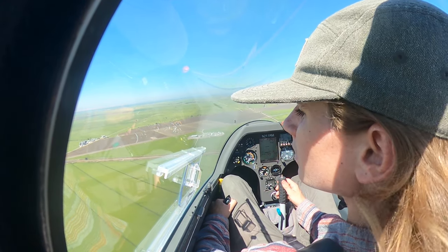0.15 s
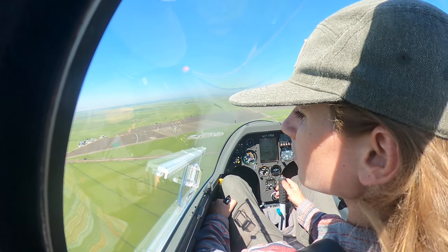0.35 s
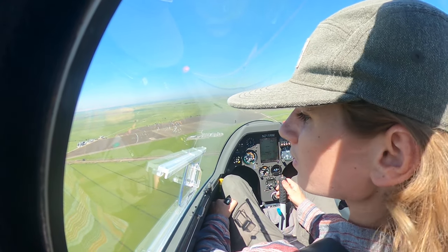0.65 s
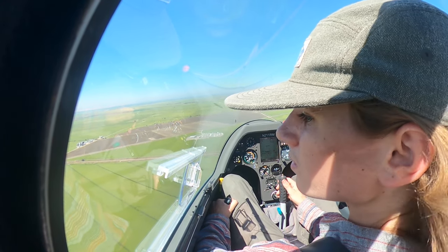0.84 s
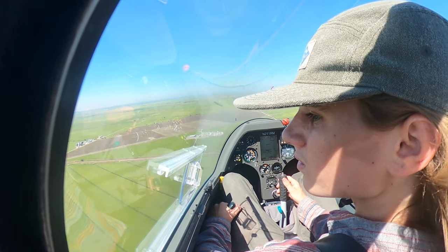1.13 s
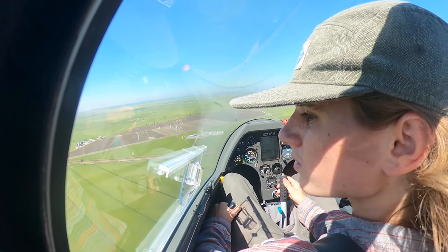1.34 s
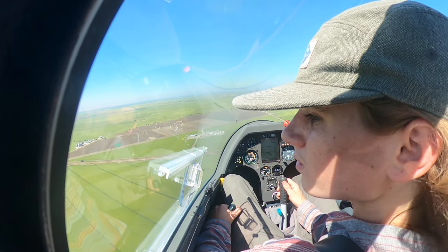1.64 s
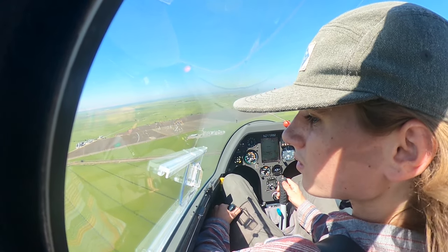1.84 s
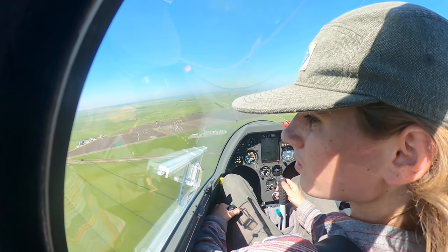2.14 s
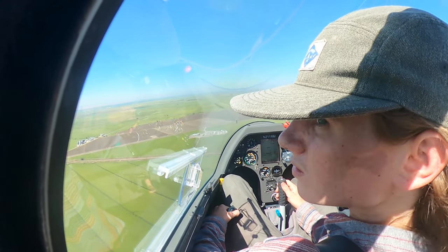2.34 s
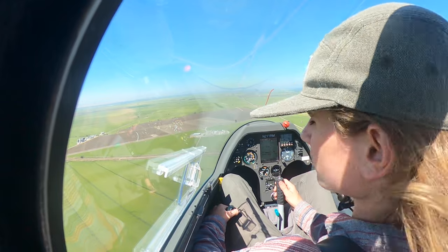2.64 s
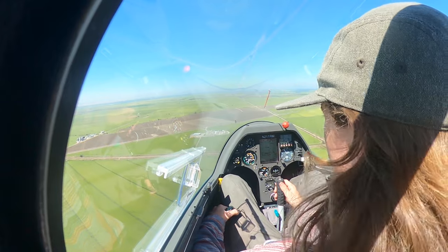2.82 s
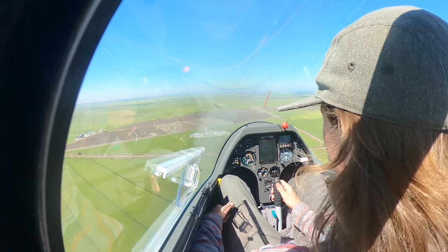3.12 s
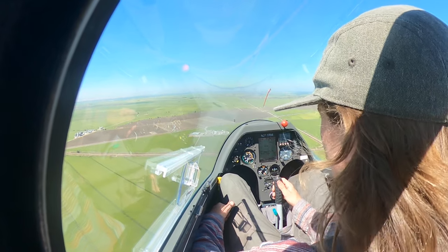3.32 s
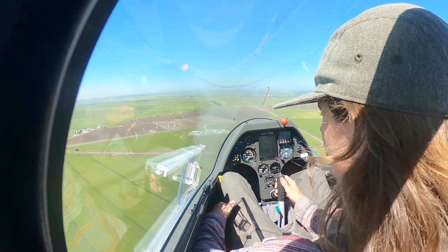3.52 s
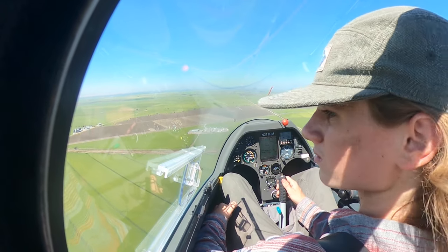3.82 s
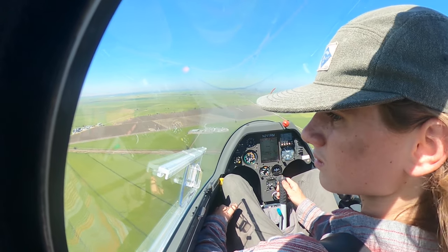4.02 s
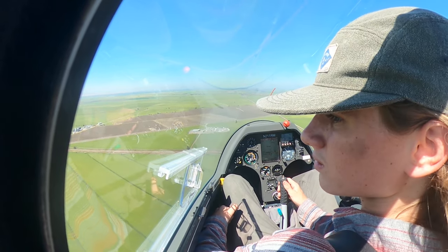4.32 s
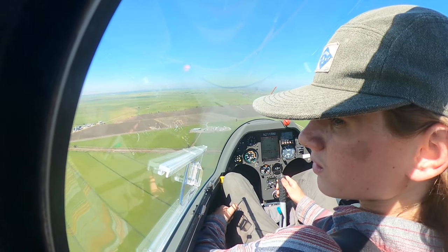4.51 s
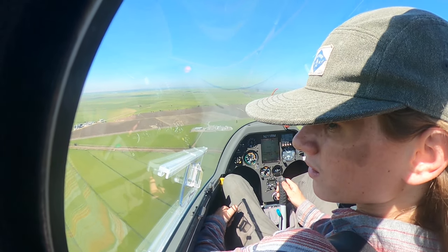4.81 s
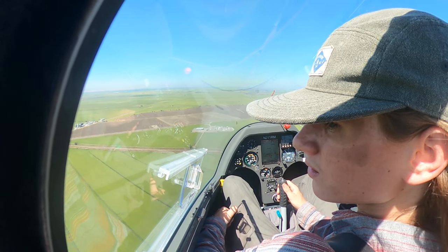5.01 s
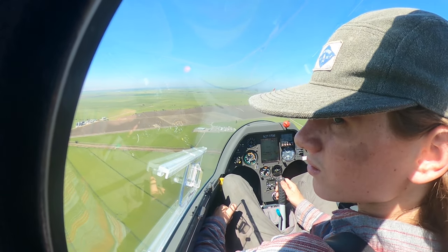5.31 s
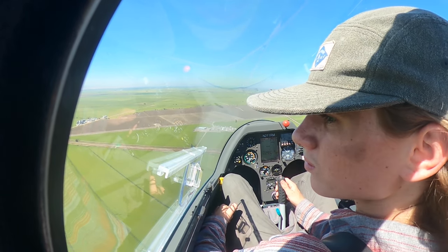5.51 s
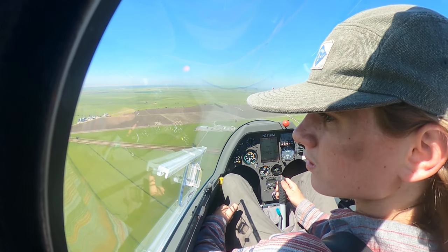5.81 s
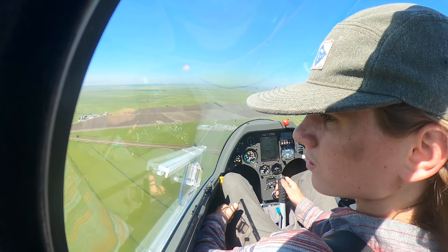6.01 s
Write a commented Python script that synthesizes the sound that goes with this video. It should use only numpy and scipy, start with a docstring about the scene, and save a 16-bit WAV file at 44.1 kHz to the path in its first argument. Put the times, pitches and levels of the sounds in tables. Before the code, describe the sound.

Steady rush of air past a glider canopy with a low wavering hum, thudding draught buffets and brief clicking knocks

```python
"""Air streams past the canopy of a glider, heard close by on a small camera with two microphone ports in
the cockpit. The turbulent boundary layer is noise with drifting patches, coloured by the modes of the cabin;
the lowest mode hums with a wavering pitch over a wide rumble of the hull. Draught from a vent buffets the
ports as short falling thuds in churning noise; gusts knock the canopy as clicks and fading bursts of noise.
Gain control eases back the loud swells."""
import sys
import numpy as np
from scipy import signal
from scipy.fft import rfft, irfft
from scipy.io import wavfile
from scipy.ndimage import uniform_filter1d

SR = 44100
rng = np.random.default_rng(int(sys.argv[2]) if len(sys.argv) > 2 else 0)


def store_pcm(level_fs):
    """Save levels as 16-bit WAV."""
    pcm = np.round(np.clip(level_fs, -1, 1) * 32767).astype(np.int16)
    wavfile.write(sys.argv[1], SR, np.atleast_2d(pcm).T)


N = 271215
T = np.arange(N) / SR  # s
HZ = np.fft.rfftfreq(N, 1 / SR)

# hiss of air through gaps, and the faint top: (frequency [Hz], relative density [dB per Hz])
HISS_COLOUR = [(500, -18), (1200, 2), (1900, -1.5), (4300, -5), (5700, -13), (6300, -12.5), (8000, -19),
               (8700, -23), (9100, -31), (10000, -40), (12500, -40), (15000, -56.5), (16000, -72)]
# gusts knock the canopy: (time [s], level of the low band [dB], level of the bright band [dB])
CANOPY_KNOCKS = [(1.066, -18, -34), (1.082, -30, -29.5), (1.104, -27.5, -36), (1.153, -19, -30),
                 (1.188, -25, -32), (1.26, -27, -26.5), (1.272, -21, -35), (1.301, -25, -46),
                 (1.335, -25, -44), (1.379, -24, -35), (1.938, -30, -33), (2.04, -31, -39),
                 (2.12, -27.5, -32), (2.329, -27, -38), (2.59, -27, -35), (2.644, -28, -38),
                 (3.155, -31.5, -46), (3.172, -28.5, -47), (4.76, -30.5, -45), (4.92, -24, -43)]


def rush():
    """Roar and hiss of the boundary layer, through the cabin's modes."""
    # roar of the shell without the cabin's modes: (frequency [Hz], relative density [dB per Hz])
    roar_colour = [(60, -52.5), (130, -11.5), (180, -10.5), (250, -14), (450, -17), (1000, -25.5),
                   (1900, -32.5), (3000, -77), (6000, -110)]
    # airflow on the shell, as the roar within 191.6-520 Hz: (time [s], level [dB])
    roar_level = [(0, -27.5), (.7, -28), (1.0, -28), (1.1, -25.5), (1.4, -26.5), (1.5, -29), (1.85, -30),
                  (2.0, -27.5), (2.25, -29), (2.4, -26.5), (2.5, -27), (2.62, -26), (2.8, -29),
                  (3.16, -28.5), (3.3, -28.5), (4.0, -29), (4.6, -27), (4.74, -27.5), (4.84, -28),
                  (4.91, -28.5), (5.1, -29.5), (5.7, -28), (6.15, -27)]
    # air seeping through gaps, as the hiss within 2320-9000 Hz: (time [s], level [dB])
    hiss_level = [(0, -38.5), (.6, -37), (1.2, -38), (1.6, -39), (3.0, -37.5), (4.0, -37.5), (5.0, -38),
                  (6.15, -37.5)]
    modes = cabin()
    roar_noise = turbulence(patchy_db=1.0, flicker_db=-0.04, breathe_db=0.3)
    roar = ports(roar_noise, gain_of(read(roar_colour, HZ)) * modes, lo=191.6, hi=520)
    hiss_noise = turbulence(patchy_db=0.54, flicker_db=-0.1, breathe_db=0.56)
    hiss = ports(hiss_noise, gain_of(read(HISS_COLOUR, HZ)) * modes, lo=2320, hi=9000)
    return roar * curve(roar_level, column=1) + hiss * curve(hiss_level, column=1)


def turbulence(patchy_db, flicker_db, breathe_db):
    """Two unrelated white noises under shared drifting patches, a broad flicker and slow narrow bands."""
    frames = N // 128 + 5
    a, b, c, d, patches, bands = rng.standard_normal((frames, 257, 6)).T
    # axis 0 is frequency, axis 1 is time
    bands = uniform_filter1d(bands, size=2, axis=0)
    bands = evened(uniform_filter1d(bands, size=90, axis=1))
    patches = uniform_filter1d(patches, size=8, axis=0)
    patches = evened(uniform_filter1d(patches, size=24, axis=1))
    flicker = evened(uniform_filter1d(rng.standard_normal(frames), size=16))
    swell_db = patchy_db * patches + flicker_db * flicker + breathe_db * bands
    spectra = np.array([a + 1j * b, c + 1j * d]) * gain_of(swell_db)
    return evened(signal.istft(spectra, nperseg=512, noverlap=384)[1][:, :N])


def cabin():
    """Gain of the cabin over frequency: one resonance bump in dB for each mode."""
    # modes of cabin and canopy that colour the rush: (centre [Hz], width [Hz], lift [dB])
    modes = [(125.7, 24, 4), (192.3, 9.2, 5), (223, 16, 6.5), (273, 62, 5), (327, 41, -0.5),
             (359.3, 50, 5.5), (402.2, 26.5, 7.5), (555, 55, 4), (720, 57, 4.5), (850.5, 35, 7.5),
             (960, 35, 6), (1131, 119, 7), (1370, 107, 4), (1534, 98, 4.5), (1696, 54, 5), (1910, 110, 3.5),
             (2216, 84, 2), (2483, 130, 5.5), (3260, 90, 2), (3400, 130, 3), (3860, 100, 2),
             (4270, 270, 2.5), (4830, 200, 1.5), (5300, 150, 3.5)]
    return gain_of(sum(db / (1 + (2 * (HZ - hz) / width) ** 2) for hz, width, db in modes))


def ports(pair, gain, lo=0, hi=SR):
    """Airborne sound at the port pair: right hears a shifted copy of left mixed with a second noise."""
    # likeness of the two ports: (frequency [Hz], share in common [0-1])
    likeness = [(100, 0.92), (300, 1), (550, 1), (1000, 1), (1400, 0.92), (2100, 0.61), (3000, 0.61),
                (5000, 0.97), (7000, 0.68), (10500, 0.9), (12500, 0.88)]
    # tilt between the ports: (frequency [Hz], left minus right [dB])
    tilt = [(30, 0.5), (60, -2), (100, -2), (180, -2), (320, -2), (560, -2.5), (980, -3), (1710, 3.5),
            (3000, 1.5), (5240, 2.0), (9160, -0.5)]
    # phase between the ports: (frequency [Hz], lead of the left [rad])
    phase_lead = [(0, -1.1), (950, 0.04), (1460, -1.28), (1890, -1.48), (2240, -0.15), (3010, -0.65),
                  (5250, -0.56), (9300, -0.0)]
    in_band = (HZ >= lo) * (HZ <= hi)
    # the colour is scaled to rms 1 within lo to hi
    first, second = rfft(pair) * gain / np.sqrt(np.mean(abs(gain) ** 2 * in_band))
    same = np.clip(read(likeness, HZ), 0, 1)
    right = same * first * np.exp(-1j * read(phase_lead, HZ)) + np.sqrt(1 - same ** 2) * second
    lean = gain_of(read(tilt, HZ) / 2)
    return irfft(np.array([first * lean, right / lean]), N)


def boom():
    """Air over an opening keeps the lowest mode sounding with a wavering pitch, over a wide rumble."""
    # lowest mode of the cabin: (time [s], pitch [Hz], level [dB])
    lowest_mode = [(0, 98.8, -16), (.17, 97.9, -45), (.3, 93.1, -18), (.4, 95.2, -34), (.48, 96.5, -21),
                   (.8, 96.1, -21), (.92, 95, -23.5), (.99, 94.2, -23.5), (1.08, 95.7, -33),
                   (1.2, 96.63, -17.5), (1.3, 97.4, -31), (1.42, 96.3, -20.5), (1.65, 95.8, -19.5),
                   (1.75, 97.1, -25.5), (1.95, 98.2, -30), (2.08, 99.3, -43), (2.15, 99, -23),
                   (2.23, 99, -28), (2.33, 97, -18.5), (2.47, 97, -25.5), (2.58, 97.3, -23),
                   (2.72, 97.8, -31), (2.9, 97, -34.5), (2.99, 95, -20), (3.09, 96, -17), (3.2, 96.9, -32),
                   (3.37, 96.4, -20.5), (3.45, 96, -26.5), (3.55, 94, -23.5), (3.67, 96, -34),
                   (3.75, 96.3, -19), (3.83, 96.5, -23), (3.95, 97.4, -33), (4.3, 97, -29),
                   (4.38, 94.6, -26), (4.47, 94.5, -23), (4.53, 95.25, -17.5), (4.61, 94.6, -25),
                   (4.68, 92.6, -29.5), (4.8, 93.4, -32), (5.0, 97, -26), (5.1, 95.7, -29),
                   (5.19, 92.5, -21), (5.28, 94.8, -34), (5.38, 96.4, -22), (5.5, 97, -30.5),
                   (5.62, 97.5, -29.5), (5.75, 95.3, -26), (5.85, 95, -26), (5.98, 96, -20.5),
                   (6.15, 94.6, -28)]
    # flexing of the whole hull, without the cabin's modes: (frequency [Hz], relative density [dB per Hz])
    rumble_colour = [(10, -16.5), (30, 3.5), (80, 0.5), (96, -7), (112, -2), (135, -5), (170, -8.5),
                     (260, -25.5), (500, -92)]
    # hull: (time [s], level of the deep rumble [dB], level of the rumble above it [dB])
    hull_level = [(0, -28, -27.5), (.5, -25, -21.5), (1.0, -26.5, -25), (1.35, -26.5, -18),
                  (1.55, -21.5, -26.5), (1.8, -27, -22), (2.3, -20, -30), (2.6, -26, -23),
                  (3.0, -23, -24.5), (3.5, -23.5, -24), (4.0, -24.5, -23.5), (4.5, -26, -25),
                  (4.9, -23, -23), (5.4, -25.5, -22.5), (6.15, -24, -26)]
    s, hz, _ = np.transpose(lowest_mode)
    pitch = np.interp(T, s, hz) + 1.81 * wander(hz=10.0)  # flutters by 1.81 Hz rms
    hum = np.sqrt(2) * np.sin(2 * np.pi * np.cumsum(pitch) / SR)
    hum = hum * curve(lowest_mode, column=2) * gain_of(2.4 * wander(hz=9.4))  # 2.4 dB rms unsteady
    deep = 1 / np.sqrt(1 + (HZ / 69) ** 10)  # the rumble splits at 69 Hz
    hull = gain_of(read(rumble_colour, HZ)) * cabin()
    noise = rng.standard_normal((2, N))
    rumble = ports(noise, hull * deep) * curve(hull_level, column=1)
    rumble = rumble + ports(noise, hull * (1 - deep)) * curve(hull_level, column=2)
    lean_db = -2.5  # hum, left minus right
    return gain_of([[lean_db / 2], [-lean_db / 2]]) * hum + gain_of(-1.9 * wander(hz=5.0)) * rumble


def buffet(swell_s=0.045, lumpy_db=9.5, lump_hz=30):
    """Each eddy is a short falling thud, opposite in the two ports; the draught churns round it."""
    # strong eddies of draught that push the ports apart: (time [s], thud level [dB],
    # share on the left [0-1], length at half height [ms], snap level [dB]); levels before the sharing
    strong_eddies = [(0.675, -14, 0.0, 13.7, -31), (1.067, -19, 0, 12, -17), (1.106, -15, 0.4, 14, -18),
                     (1.58, -12.5, 0.02, 12, -33), (1.9, -14.5, 0.8, 4.8, -27.5), (1.934, -11, 0.3, 4, -8),
                     (2.37, -16, 0.28, 12, -11), (2.599, -12, 0.6, 12, -25), (2.754, -17.5, 0.54, 8, -10),
                     (2.967, -13.5, 0.13, 15, -13), (3.087, -20.5, 0, 11, -27),
                     (3.16, -11.5, 0.08, 7.1, -5), (3.177, -9.5, 0.08, 10, -14),
                     (3.198, -15.5, 0.2, 9.3, -26), (3.572, -15.5, 0, 9.5, -18),
                     (3.639, -8.5, 0.6, 6.6, -26), (3.835, -15.5, 0.6, 6.8, -15),
                     (4.057, -12.5, 0.0, 8, -17), (4.462, -15, 0.09, 7.6, -37),
                     (4.514, -24, 0.26, 10.1, -21), (4.781, -6.5, 0.82, 6.4, -11),
                     (4.856, -11.5, 0.77, 6.4, -28), (4.924, -14, 0.86, 10, -11),
                     (5.147, -19, 0.96, 15, -36), (5.866, -19, 0.33, 6.6, -21)]
    # colour of the draught on the ports: (frequency [Hz], relative density [dB per Hz])
    draught_colour = [(15, -17.5), (60, 0.5), (110, -2), (250, -8.5), (450, -17.5), (900, -36.5),
                      (3000, -110)]
    sag_s, buffet_db = .012, -31  # how fast the pitch of an eddy falls; churn before its port gains
    out, t = np.zeros((2, N)), np.arange(-1500, 1500) / SR
    draught = np.full(N, gain_of(-25.0))  # relative floor between eddies
    eddies = strong_eddies + small_eddies()
    for (s, db, left, ms, snap_db), (pitch, way, edge) in zip(eddies, rng.random((len(eddies), 3))):
        # the pitch falls through 130-200 Hz at the middle of the thud
        turn = 2 * np.pi * (130 + 70 * pitch) * sag_s * (1 - np.exp(-t / sag_s))
        shape = np.exp(-np.log(2) * (2000 * t / ms) ** 2)
        thud = np.sqrt(2) * gain_of(db) * shape * np.cos(turn + .5)
        front = t + 0.0023  # a brighter snap leads the thud by 2.3 ms
        snap = np.exp(-(front / 0.0016) ** 2) * np.sin(2 * np.pi * (400 + 200 * edge) * front)
        thud += gain_of(snap_db) * snap
        thud *= np.sign(way - .5)  # push or suck
        add(out, max(s + t[0], 0), np.clip([[left * 0.75], [left - 1]], -1, 1) * thud)
        near = slice(max(round((s - .25) * SR), 0), round((s + .25) * SR))
        swell = np.sqrt(gain_of(db)) * np.exp(-((T[near] - s) / swell_s) ** 2)
        draught[near] = np.maximum(draught[near], swell)
    lumps = gain_of(lumpy_db * np.minimum(wander(hz=lump_hz), 1.6))
    churn = rng.standard_normal(N) * evened(draught) * lumps
    churn = filtered(churn, gain_of(read(draught_colour, HZ)))
    return out + gain_of(buffet_db) * np.array([[.8], [-1.1]]) * churn


def small_eddies(count=28):
    """Rows for the weak eddies: time, strength, side and length all by chance."""
    when, strength, left, length = rng.random((count, 4)).T
    db = -20 + 6.5 * strength
    ms = 13 + (24 - 13) * length
    return list(zip(when * T[-1], db, left, ms, db - 18))  # the snap is 18 dB below the thud


def shudder():
    """Gusts strike the canopy: a blow and rough noise in two wide bands of the shell, and a puff of hiss."""
    low_fade, bright_fade = 382, 500  # dB per s
    low = bump(310, 0.5)
    bright = bump(1400, 0.32)
    airy = bump(7500, 0.53) * gain_of(read(HISS_COLOUR, HZ))
    noise = rng.standard_normal((3, 2, N))
    puff = ports(noise[2], airy) * gain_of(-44) * np.exp(-((T - 1.073) / 0.075) ** 2)
    modes = cabin()
    ring = modes ** 1.9  # a blow makes the modes stand out more than the rush does
    struck = ports(blows(column=1), causal(low * ring)) + ports(blows(column=2), causal(bright * ring))
    low_rattle = ports(noise[0], low * modes)
    low_rattle = low_rattle * sum(knock(s, db, low_fade) for s, db, _ in CANOPY_KNOCKS)
    bright_rattle = ports(noise[1], bright * modes)
    bright_rattle = bright_rattle * sum(knock(s, db, bright_fade) for s, _, db in CANOPY_KNOCKS)
    return puff + struck + low_rattle + bright_rattle


def bump(centre_hz, width):
    """A wide band of the shell: a bell over log frequency, its width in natural-log units."""
    return np.exp(-.5 * (np.log((HZ + 1) / centre_hz) / width) ** 2)


def knock(s, db, fade_db_per_s, rise_s=0.0034):
    """Quick rise to a top at s, then a steady fade in dB."""
    fade = gain_of(db - fade_db_per_s * np.maximum(T - s, 0))
    return fade * np.exp(-(np.minimum(T - s, 0) / rise_s) ** 2)


def blows(column, blow_db=23.5):
    """The firm blow at the top of each knock: one sample, blow_db above the knock's level in the table."""
    out = np.zeros((2, N))  # only the noise that both ports share is struck
    for row in CANOPY_KNOCKS:
        out[0, round(row[0] * SR)] = -gain_of(row[column] + blow_db)
    return out


def causal(gain):
    """The same colour in minimum phase, ringing only after the blow."""
    fold = irfft(np.log(gain + 1e-4), N)  # cepstrum, folded onto positive time
    fold[1:N // 2 + 1] *= 2
    fold[N // 2 + 1:] = 0
    return np.exp(rfft(fold))


def wander(hz):
    """Slow chance of rms 1, up to about hz."""
    return filtered(rng.standard_normal(N), 1 / (1 + (HZ / hz) ** 2))


def filtered(x, gain):
    """Noise coloured by a gain over frequency, at rms 1."""
    return evened(irfft(rfft(x) * gain, N))


def evened(x):
    """Scales to rms 1."""
    return x / np.sqrt(np.mean(x ** 2) + 1e-20)


def gain_of(db):
    """Amplitude gain of a level in dB."""
    return 10 ** (np.asarray(db) / 20)


def read(points, hz):
    """Reads a table along log frequency."""
    f, value = np.transpose(points)
    return np.interp(np.log(hz + 1), np.log(f + 1), value)


def curve(rows, column):
    """One column of a table in dB, as gain along time."""
    rows = np.array(rows)
    return gain_of(np.interp(T, rows[:, 0], rows[:, column]))


def add(mix, s, sound):
    """Lays a sound into the mix from time s."""
    part = mix[:, round(s * SR):][:, :sound.shape[1]]
    part += sound[:, :part.shape[1]]


def scene():
    """Rush, boom, knocks and buffeting together at the two ports."""
    return rush() + boom() + shudder() + buffet()


def record(dry, reach=630.0):
    """Gain control leans smoothly on the loud swells; then the top is cut at 15.7 kHz."""
    power = uniform_filter1d((dry ** 2).mean(0), int(reach))  # reach in samples
    power = uniform_filter1d(power, int(reach))
    over_db = 10 * np.log10(1 + abs(power) / gain_of(-22.5) ** 2)  # soft knee
    held = gain_of(2.0) * dry / gain_of(0.3 * over_db)
    held = np.pad(held, ((0, 0), (255, 255)), "reflect", reflect_type="odd")
    low_pass = signal.firwin(511, 15700, window=("kaiser", 9), fs=SR)
    return signal.oaconvolve(held, low_pass[None], "valid")


dry = scene()
out = record(dry)
store_pcm(out)
```